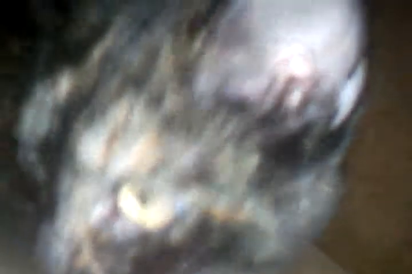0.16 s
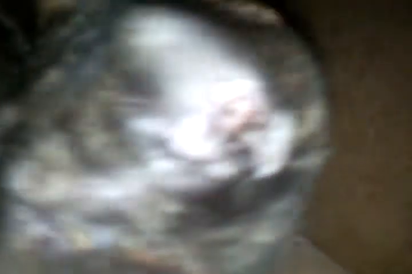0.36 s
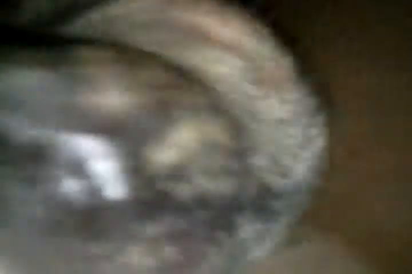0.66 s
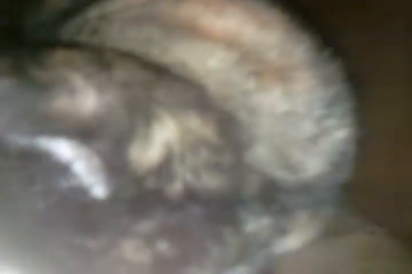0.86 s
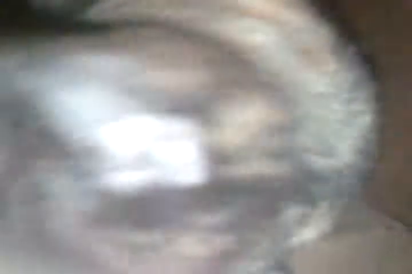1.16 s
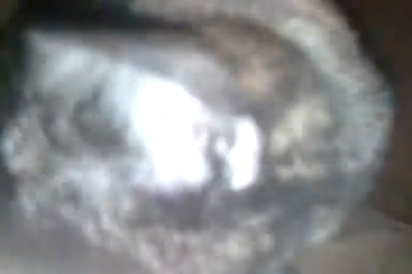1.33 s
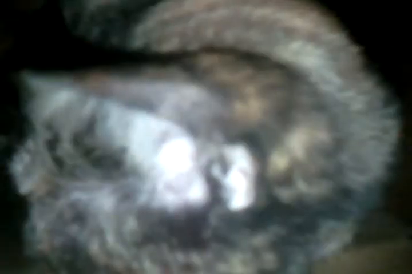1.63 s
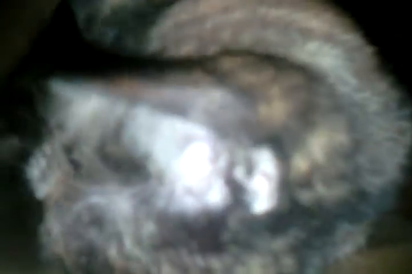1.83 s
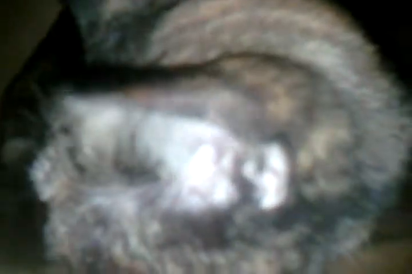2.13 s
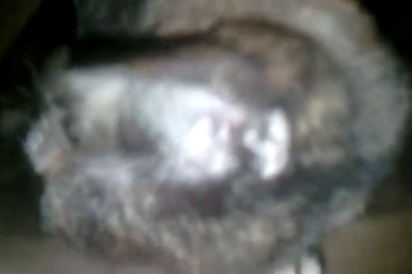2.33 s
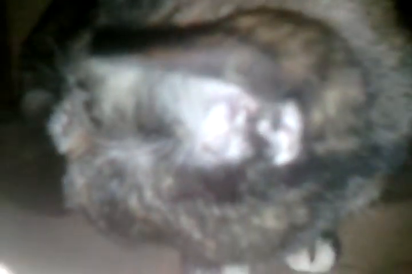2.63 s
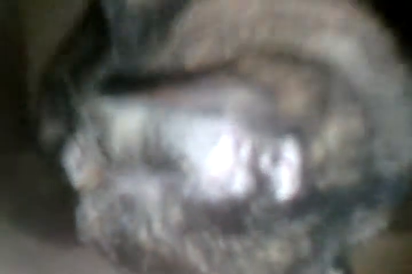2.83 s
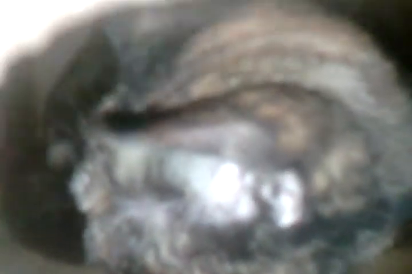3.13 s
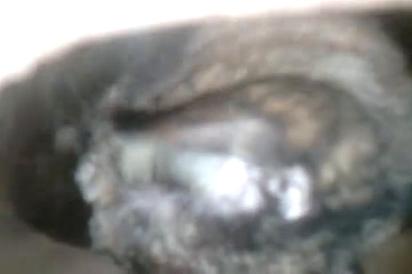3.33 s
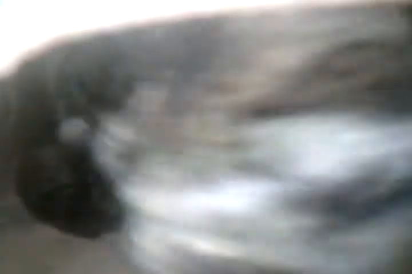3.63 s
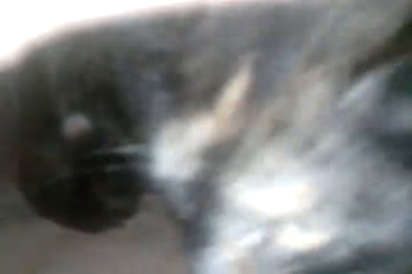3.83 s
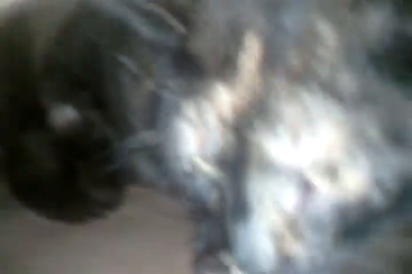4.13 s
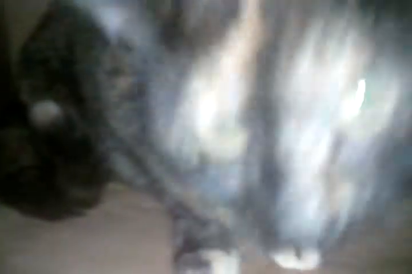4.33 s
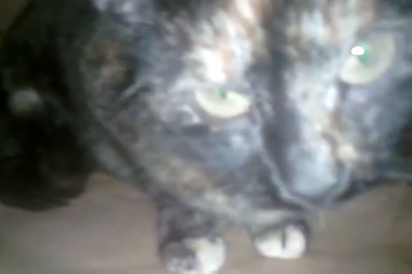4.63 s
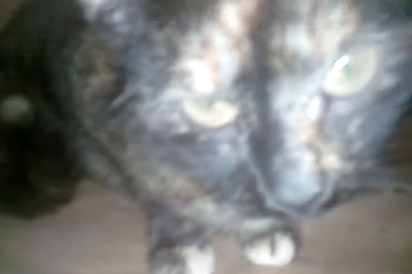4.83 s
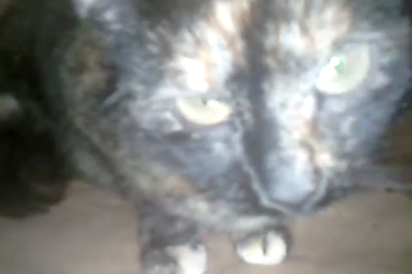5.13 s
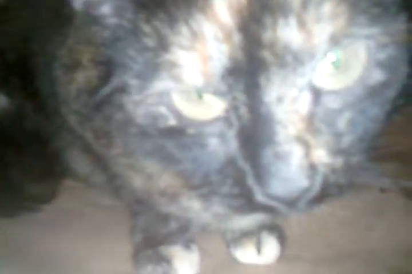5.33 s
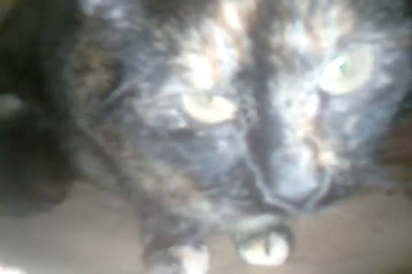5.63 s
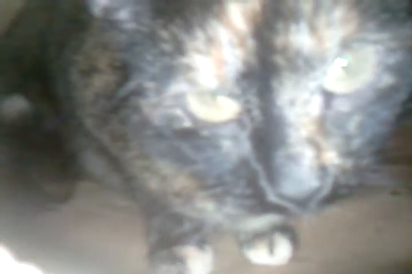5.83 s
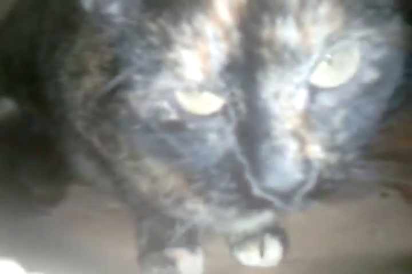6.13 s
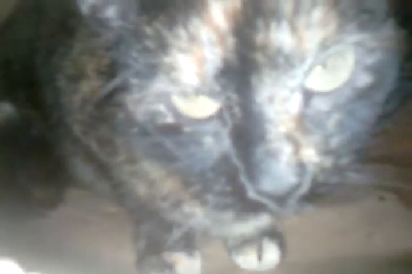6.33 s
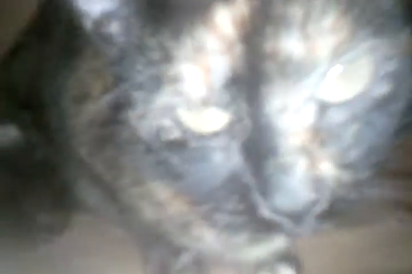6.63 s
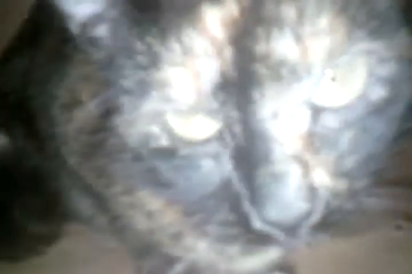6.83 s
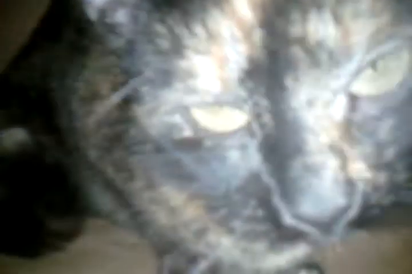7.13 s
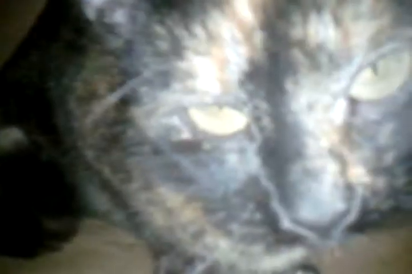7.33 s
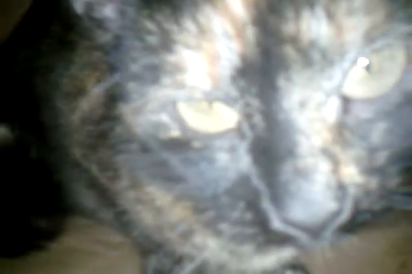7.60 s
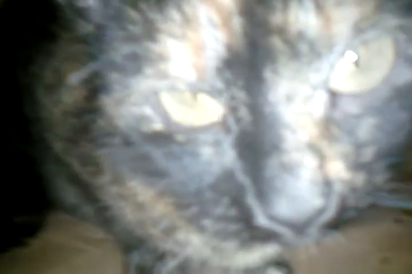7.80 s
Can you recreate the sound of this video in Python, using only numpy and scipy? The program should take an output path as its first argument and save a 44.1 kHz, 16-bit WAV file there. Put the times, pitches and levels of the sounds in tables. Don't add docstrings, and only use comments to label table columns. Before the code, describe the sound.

A cat holds a low, buzzing, closed-mouth growl close to the microphone for about four seconds. Loud, short fingertip taps on a hard surface crack over it, with nail scratches and skin rubbing fur and cloth. The growl stops; after a brief quiet comes a padded thump, two duller firm taps, then faint brushing and one last click. Dry, quiet room with soft hiss.

```python
import sys
import numpy as np
from scipy import signal
from scipy.fft import rfft, irfft
from scipy.io import wavfile
from scipy.ndimage import uniform_filter1d

SR = 44100
rng = np.random.default_rng(int(sys.argv[2]) if len(sys.argv) > 2 else 0)


def decibels_to_gain(level_db):
    exponent = np.asarray(level_db, float) / 20
    return 10 ** exponent


def waveform_to_disk(signal):
    frames = np.transpose(np.atleast_2d(signal))
    scaled = np.clip(frames, -1, 1) * 32767
    samples = np.round(scaled).astype(np.int16)
    wavfile.write(sys.argv[1], SR, samples)


N = 351256


def read(points, hz):
    f, value = np.transpose(points)
    return np.interp(np.log(hz + 1), np.log(f + 1), value)


def curves(rows):
    s, *columns = np.transpose(rows)
    return [np.interp(np.arange(N) / SR, s, c) for c in columns]


def evened(x):
    return x / np.sqrt(np.mean(x ** 2) + 1e-20)


def coloured(x, spectrum):
    gain = decibels_to_gain(read(spectrum, np.fft.rfftfreq(N, 1 / SR)))
    return evened(irfft(rfft(x) * gain, N))


def drift(hz):
    slow = signal.butter(2, hz, fs=SR, output="sos")
    return evened(signal.sosfilt(slow, rng.standard_normal(N)))


def ring(modes, seconds):
    t = np.arange(round(seconds * SR)) / SR
    out = sum(decibels_to_gain(db - 60 * t / t60) * np.cos(2 * np.pi * hz * t) for hz, db, t60 in modes)
    return out / abs(out).max()


def preamplifier_noise():
    # f/Hz, density level/dB
    hiss_spectrum = [(20, -27), (36, -9), (240, -9.5), (1100, -16.5), (3000, -21), (7000, -23),
                     (14000, -23), (15500, -39)]
    hiss = decibels_to_gain(-64) * coloured(rng.standard_normal(N), hiss_spectrum)
    whine = decibels_to_gain(-85) * np.sin(2 * np.pi * 1108 * np.arange(N) / SR)
    return hiss + whine


def knocks():
    # t/s, level/dB, f/Hz, rise/s, t60/s
    soft_blows = [
        (5.353, -22, 150, 0.0041, 0.03),
        (5.357, -32.5, 240, 0.0063, 0.08),
        (5.36, -37, 330, 0.005, 0.047),
        (5.375, -37, 125, 0.0088, 0.098),
        (5.36, -42.5, 73, 0.012, 0.184),
        (.865, -49, 78, .012, .12),
        (7.872, -59, 164, 0.006, 0.069),
    ]
    out = np.zeros(N + SR)
    t = np.arange(round(.3 * SR)) / SR
    for s, db, hz, rise_s, t60 in soft_blows:
        swell = (1 - np.exp(-(t / rise_s) ** 2)) * decibels_to_gain(db + 5.0 - 60 * t / t60)
        out[round(s * SR):][:len(t)] -= swell * np.sin(2 * np.pi * hz * t)
    return out[:N]


def stroke_levels():
    # t/s, length/s, level/dB, brightness/dB
    skids = [(1.136, 0.057, -65.5, -8), (1.545, 0.027, -57, -1), (1.796, 0.055, -54, 0.5),
             (1.989, 0.088, -55.5, 4.5), (3.296, 0.12, -59.5, -1), (3.629, 0.068, -61, -8.5),
             (3.858, .12, -59, -0.5), (5.65, 0.1, -57.5, -1), (5.879, 0.061, -57, -4),
             (6.098, .026, -68, 4)]
    scratches = [(1.33, .081, -67, -15), (1.627, 0.025, -47, 6), (1.725, 0.026, -67, 4),
                 (1.888, 0.034, -49, 6.5), (2.116, 0.059, -54, 6), (2.229, 0.075, -65.5, -1),
                 (2.598, 0.095, -61.5, -12), (2.77, 0.066, -77, 13), (3.428, 0.019, -54, 8.5),
                 (3.975, 0.027, -60, 1), (5.35, 0.017, -53.5, 6), (5.36, 0.066, -46, 2),
                 (5.469, 0.024, -62.5, 4), (5.456, 0.015, -46, -1), (5.933, 0.054, -55.5, -4),
                 (6.15, .025, -73, -3), (7.039, 0.03, -70.5, 3)]
    brushes = [(.849, 0.2, -56, -8.5), (2.913, 0.076, -68.5, 8.5), (3.08, 0.093, -83, 8.5),
               (4.23, 0.034, -72, -2), (4.36, 0.21, -62.5, -4.5), (6.58, 0.086, -70.5, 2),
               (6.87, 0.098, -79, 2)]
    rasps = [(0.563, 0.11, -74, 2), (1.038, 0.095, -66, -3), (3.692, .02, -52, -1), (4.62, 0.16, -74, -2),
             (7.15, 0.062, -72, -3), (7.7, .07, -70, -3), (7.876, 0.13, -54, 1)]
    # drag level/dB, scrape level/dB, swish level/dB, fizz level/dB
    skid_colour = (2, 0.5, -4.5, -25.5)
    scratch_colour = (-17.5, 1.5, -7, -22)
    brush_colour = (-29, -10.5, -1, 0.5)
    rasp_colour = (-19, -0.5, -13.5, -16.5)
    brightens = np.array((-1, 0, 1, 1))
    kinds = [(skids, skid_colour, .06), (scratches, scratch_colour, .3),
             (brushes, brush_colour, .15), (rasps, rasp_colour, .05)]
    levels = np.zeros((4, N + SR))
    for rows, colour_db, grip in kinds:
        for s, seconds, db, bright_db in rows:
            u = np.arange(round(1.5 * seconds * SR)) / (seconds * SR)
            shape = 1.2 * (1 - np.exp(-(u / grip) ** 2)) * np.exp(-(u / .9) ** 6)
            gain = decibels_to_gain(db + np.add(colour_db, bright_db * brightens))
            start = round(s * SR)
            levels[:, start:start + len(shape)] += gain[:, None] * shape
    return levels[:, :N]


def rubbing():
    # t/s, level/dB
    pressure = [(0, -81.5), (1.05, -68), (1.8, -74.5), (2.5, -65), (2.9, -76), (3.25, -68), (4.1, -78.5),
                (5.8, -82), (6.8, -73.5), (7.96, -80)]
    # f/Hz, density level/dB
    drag_spectrum = [(120, -28), (250, 4), (650, -4), (950, -7), (1300, -17), (1700, -42.5)]
    near_spectrum = [(900, -9), (1350, -7.5), (1700, -2), (2000, -0.5), (2300, -5), (3000, -13),
                     (3600, -23.5), (4400, -32)]
    far_spectrum = [(900, -14), (1600, -10.5), (2200, -6.5), (2550, -2), (2900, -8), (3500, -12),
                    (4200, -21), (5000, -29)]
    swish_spectrum = [(3000, -31.5), (4200, -14.5), (5300, -7.5), (6200, -6), (7000, -1.5), (8000, -6),
                      (9500, -15.5), (11000, -36)]
    fizz_spectrum = [(7000, -34.5), (9500, 4), (12000, 6.5), (14000, 0.5), (16000, -17.5)]
    clumps_db = 2.4 * drift(hz=500) + 1.1 * drift(hz=40)
    slips = rng.standard_normal(N) * decibels_to_gain(clumps_db)
    levels = stroke_levels()
    pressure_db = curves(pressure)[0] + 2.5 * drift(hz=8)
    levels[1:3] += decibels_to_gain(np.add.outer((-4.5, -0.5), pressure_db))
    t = np.arange(N) / SR
    on_far_surface = (t > 5.2) & (t < 7.1)
    scrape = np.where(on_far_surface, coloured(slips, far_spectrum), coloured(slips, near_spectrum))
    drag, swish, fizz = (coloured(slips, part) for part in (drag_spectrum, swish_spectrum, fizz_spectrum))
    return (levels * [drag, scrape, swish, fizz]).sum(0)


def taps(rows, thud, blow, nail, echoes, contact_s):
    out = np.zeros(N + SR)
    push = signal.windows.tukey(round(contact_s * SR) + 2, .4)
    t = np.arange(round(.2 * SR)) / SR
    for s, blow_db, thud_db, tick_db, tick_hz in rows:
        low = decibels_to_gain(blow_db + 6) * ring(blow, .2)
        nail_modes = [(min(share * tick_hz, 20000), db, t60) for share, db, t60 in nail]
        tick = ring(nail_modes, .2) * (1 - np.exp(-t / .0001))
        sharp = -np.convolve(low, push / push.sum())[:len(t)] - decibels_to_gain(tick_db + 12.5) * tick
        sound = sharp - decibels_to_gain(thud_db + 12.5) * ring(thud, .2) * (1 - np.exp(-t / 0.00035))
        for delay, db in echoes:
            lag = round(delay * SR)
            sound[lag:] += decibels_to_gain(db) * sharp[:-lag]
        scatter_gain = decibels_to_gain(-37.0 - 60 * t / 0.046) * (1 - np.exp(-t / 0.00069))
        scatter = rng.standard_normal(len(t)) * scatter_gain
        sound += signal.fftconvolve(scatter, sharp[:40])[:len(t)]
        out[round(s * SR):][:len(t)] += sound
    return out[:N]


def far_taps():
    # t/s, blow level/dB, thud level/dB, tick level/dB, tick centre f/Hz
    far_blows = [
        (5.3878, -36, -48, -55, 6800),
        (5.463, -44, -73, -44.5, 7200),
        (5.6552, -20, -27.5, -23, 7020),
        (5.7145, -68.5, -57, -48, 10500),
        (5.8776, -19, -31.5, -27.5, 7130),
        (6.1025, -41.5, -48, -65, 7400),
        (7.8805, -66, -61, -49, 7000),
    ]
    # f/Hz, level/dB, t60/s
    thud_modes = [(80, -8, 0.16), (128.5, -5.5, 0.246), (162.5, -1.5, 0.13), (221, 5, 0.094),
                  (292, 4.5, 0.081), (428, -10.5, 0.16)]
    blow_modes = [(453, -4.5, 0.12), (687, 5, 0.069), (894, 9.5, 0.027), (1202, 5, 0.041), (1634, 2, 0.027),
                  (1930, 14.5, 0.0079), (2400, 19.5, 0.0076), (2630, -27, 0.0054), (3400, -51, .005)]
    # share of the tick centre, level/dB, t60/s
    tick_modes = [(.45, -24.5, 0.0028), (.52, 8.5, 0.0072), (.64, 5, 0.0022), (.77, 7.5, 0.0064),
                  (.93, 14, 0.0032), (1.01, 15, 0.0043), (1.11, 9.5, .005), (1.28, -8, 0.0056),
                  (1.4, -20, .004), (1.9, -16, .003)]
    # delay t/s, level/dB
    bounces = [(.0007, 6), (.0012, -5.5), (.002, -4.5)]
    return taps(far_blows, thud_modes, blow_modes, tick_modes, bounces, contact_s=.0002)


def near_taps():
    # t/s, blow level/dB, thud level/dB, tick level/dB, tick centre f/Hz
    near_blows = [(.5925, -64, -74, -43.5, 7200), (.8547, -58, -47, -47.5, 5900),
                  (1.1425, -26, -39, -37.5, 6900), (1.376, -54, -70, -52, 6700),
                  (1.425, -62, -70, -56, 6500), (1.5461, -10, -24, -22, 6760),
                  (1.7906, -5, -21, -12.5, 6700), (1.9892, -18.5, -38, -25.5, 6730),
                  (2.127, -34, -64, -49, 6800), (2.82, -41.5, -68, -70, 6500),
                  (3.1185, -69, -71, -44, 8040), (3.2981, -3.5, -24, -11.5, 7050),
                  (3.438, -38, -59, -59.5, 6500), (3.6256, 1, -19, -17.5, 5520),
                  (3.7015, -33.5, -57, -44, 6500), (3.8618, -6.5, -27.5, -28.5, 5180),
                  (3.9495, -52, -65, -44, 7500), (3.991, -50, -63, -56, 6540),
                  (7.1176, -25, -41.5, -74, 6100), (7.11806, -24, -43, -68, 6000)]
    # f/Hz, level/dB, t60/s
    thud_modes = [(136.4, -13.5, 0.15), (199, -8.5, 0.11), (243, 0.5, 0.05), (354, 0.5, 0.027),
                  (457.3, -9.5, 0.049)]
    blow_modes = [(627, 5.6, 0.025), (730, 6.1, 0.027), (936, 1.9, 0.029), (1090, 1, 0.018),
                  (1565, 16, 0.0043), (1970, 11, .008), (2273, 8.5, 0.016), (2880, 3.5, 0.0052)]
    # share of the tick centre, level/dB, t60/s
    tick_modes = [(.58, -23, 0.0016), (.8, -2.5, 0.0063), (.94, 7, 0.0039), (1.072, 9, 0.0038),
                  (1.3, -5.5, 0.0064), (1.45, -29, .003), (1.6, -11, 0.004), (2.62, -5.5, 0.0045)]
    # delay t/s, level/dB
    bounces = [(.0006, -14), (.0011, -15.5), (.0022, -21)]
    direct = taps(near_blows, thud_modes, blow_modes, tick_modes, bounces, contact_s=.00034)
    notch_hz, width_hz = 3750, 1100
    notched = signal.lfilter(*signal.iirnotch(notch_hz, notch_hz / width_hz, SR), direct)
    return .25 * direct + .75 * notched


def growl():
    # t/s, level/dB
    effort = [(0, -48), (.75, -44.5), (1.04, -48), (1.95, -48.5), (2.75, -52.5), (3.1, -50.5),
              (3.55, -52.5), (3.9, -50), (3.99, -58)]
    # t/s, slap rate f/Hz, second oscillator f/Hz, irregularity 0-1
    folds = [(0, 94, 160, .09), (.5, 98, 165, .1), (.7, 102, 175, .04), (1.05, 103, 158, .1),
             (1.3, 100, 163, .14), (2.25, 110, 190, .18), (2.6, 112, 152, .2), (2.85, 112, 185, .15),
             (3.99, 115, 168, .24)]
    # f/Hz, bandwidth/Hz, level/dB
    throat = [(104, 52, -37), (161, 27, 4), (192.7, 12, -5.5), (280, 21, -5.5), (386.6, 30, 1),
              (440.4, 35, -4.5), (545, 52, -10.5), (695, 120, -19.5), (820, 240, -16.5)]
    effort_db, = curves(effort)
    slap_hz, puller_hz, uneven = curves(folds)
    wander = drift(hz=12)
    shake, spread = rng.standard_normal(N), rng.standard_normal(N)

    angle = 2 * np.pi * np.cumsum(puller_hz * (1 + .15 * uneven * drift(hz=15))) / SR
    cycles = np.cumsum(slap_hz * (1 + .2 * uneven * wander)) / SR
    at = np.flatnonzero(np.diff(np.floor(cycles)) > 0)
    pull_s = .0014 * np.sin(angle[at]) + .003 * (uneven * shake)[at]
    slap_db = 2 * np.cos(angle[at]) + 9 * (uneven * spread)[at]
    slaps = np.zeros(N)
    slaps[np.clip(at - pull_s * SR, 0, N - 1).astype(int)] = decibels_to_gain(slap_db)

    t = np.arange(-.003, .1, 1 / SR)
    swell = np.where(t < 0, np.exp(-(t / 0.0021) ** 2), 1)
    modes = [decibels_to_gain(db) * swell * np.exp(-np.pi * width_hz * t) * np.cos(2 * np.pi * hz * t)
             for hz, width_hz, db in throat]
    low = signal.oaconvolve(slaps, sum(modes[:3]))[:N]
    high = signal.oaconvolve(slaps, sum(modes[3:]))[:N]
    flutter = .6 * np.clip(1 - 7 * uneven, .1, 1) * np.cos(angle - 2 * np.pi * puller_hz * .0038)
    voice = evened(low + high) + .17 * evened(low) + flutter

    no_bass = signal.butter(2, 95, "high", fs=SR, output="sos")
    voice = signal.sosfiltfilt(no_bass, voice)
    voice /= np.sqrt(uniform_filter1d(voice ** 2, SR // 8) + 1e-9)
    ending = np.clip((effort[-1][0] - np.arange(N) / SR) / .03, 0, 1)
    return decibels_to_gain(effort_db) * voice * ending


def scene():
    no_bass = signal.butter(2, 90, "high", fs=SR, output="sos")
    tapping = signal.sosfilt(no_bass, near_taps() + far_taps())
    return (growl() + tapping + knocks() + rubbing())[None]


def roll_off(x):
    return signal.sosfilt(signal.butter(12, 15860, fs=SR, output="sos"), x)


def record(dry):
    clipped = np.clip(dry + preamplifier_noise(), -.7, .7)
    band_limit = signal.firwin(301, 14750, window=("kaiser", 3), fs=SR)
    limited = signal.oaconvolve(clipped, band_limit[None], "same")
    mix = limited + .0127
    return roll_off(mix)


dry = scene()
out = record(dry)
waveform_to_disk(out)
```